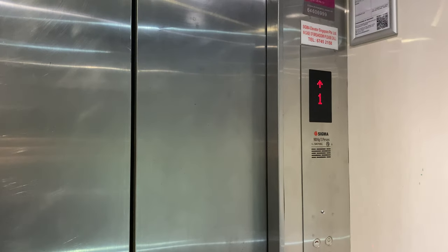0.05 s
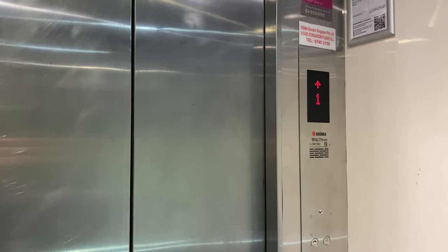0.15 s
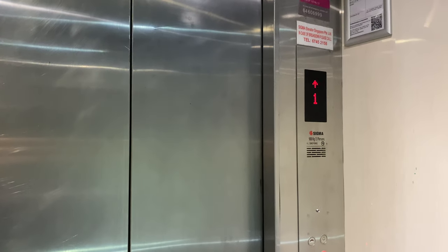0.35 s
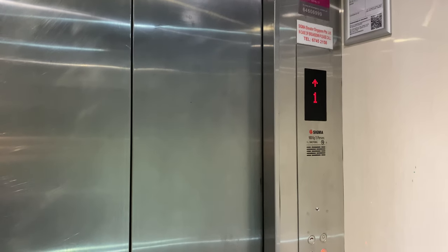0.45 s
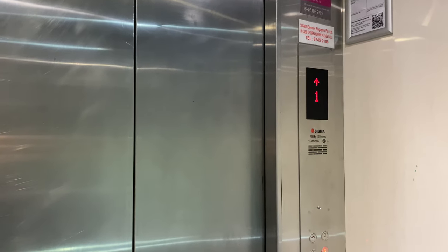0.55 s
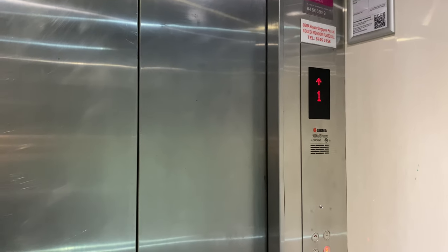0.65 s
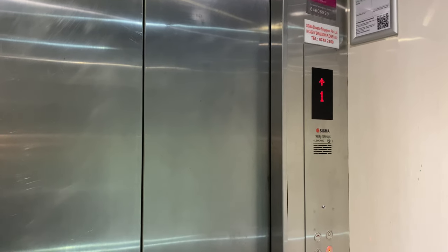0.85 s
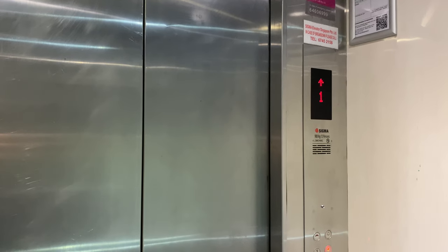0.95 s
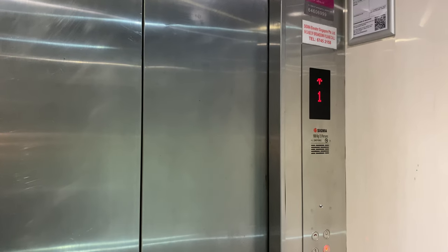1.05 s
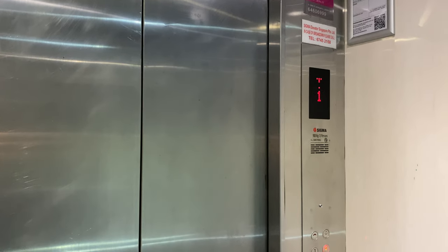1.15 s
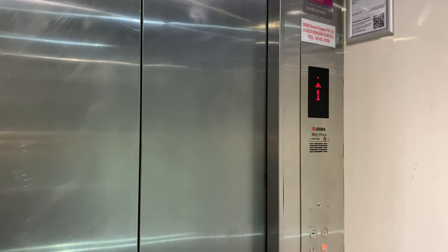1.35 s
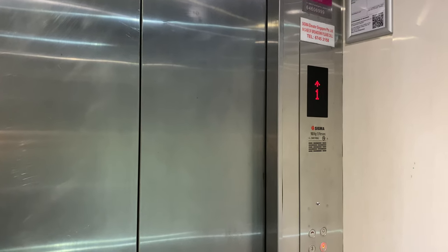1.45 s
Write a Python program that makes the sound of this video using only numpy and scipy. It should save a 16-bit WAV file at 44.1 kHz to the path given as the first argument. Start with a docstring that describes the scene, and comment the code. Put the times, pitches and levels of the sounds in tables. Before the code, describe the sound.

Close to the microphone, metal elevator doors clunk together with a ringing rattle, then latch with a lighter knock. Machinery rumbles low throughout, with a faint high hiss, inside the reflective elevator car.

```python
"""Steel lift doors close over a low rumble: a tick, the edges touch, then the panels clunk together,
rebound and ring. The lock drops with a lighter knock and the car booms softly as it settles.
The machinery hums on with a faint high hiss, a squeak and a whistle.
Heard as from a stereo microphone near the doors, in a hard-walled space: each blow rings modes of
the steel and leaves a dense tail of wall reflections, narrow in the bass and wide in the treble."""
import sys
import numpy as np
from scipy import signal
from scipy.fft import rfft, irfft
from scipy.io import wavfile
from scipy.ndimage import uniform_filter1d

SR = 44100
rng = np.random.default_rng(int(sys.argv[2]) if len(sys.argv) > 2 else 0)


def unload_audio(sound):
    """Save the sound as a 16-bit wav file, at the path given as the first command line argument."""
    columns = np.transpose(np.atleast_2d(sound))
    # keep every value between -1 and 1, then stretch to whole-number steps
    steps = np.round(np.clip(columns, -1, 1) * 32767)
    wavfile.write(sys.argv[1], SR, steps.astype(np.int16))


N = 66150

# stereo width at the microphone, side against mid: frequency_hz, gain_db
STEREO_WIDTH = [(50, -12.5), (110, -6.5), (220, -5), (600, -5), (1200, -1), (2300, 1), (15000, -2)]
# rumble and air of the machinery: frequency_hz, density_db
RUMBLE_SPECTRUM = [(20, -42), (45, 3.5), (75, 1.5), (125, -2), (180, -8), (260, -12), (450, -14.5),
                   (850, -17.5), (1150, -20), (1700, -28.5), (2300, -32), (2600, -31.5), (3100, -38),
                   (4700, -40.5), (8000, -53), (16000, -62.5)]
# hum lines of the machinery: pitch_hz, level_db
HUM_LINES = [(102.3, -48), (134.6, -48), (247.6, -60.5), (630, -64), (824, -61.5), (867, -64.5)]
# swell of rumble and hum together: time_s, gain_db
MACHINE_SWELL = [(0, 0), (.2, 2), (.6, 2), (.9, 0.5), (1.2, -.5), (1.5, -1)]
# colour of the hiss: frequency_hz, density_db
HISS_SPECTRUM = [(1000, -17), (3000, 4), (6700, -2.5), (8500, -8), (11000, -7.5), (12300, -51), (14000, -7),
                 (16000, -29)]
# swell of the hiss: time_s, level_db
HISS_SWELL = [(0, -93), (.49, -66), (.52, -59), (.85, -60), (1.1, -66), (1.22, -61.5), (1.5, -68)]
# thin whistle of the machinery: time_s, pitch_hz, level_db
WHISTLE_PATH = [(0, 13600, -87), (.93, 13500, -80), (1.15, 14300, -69.5), (1.28, 14500, -66),
                (1.45, 14200, -81)]
# jolts of the car: start_s, pitch_hz, level_db
CAR_JOLTS = [(0.314, 44, -34), (.700, 52.4, -23.5), (.704, 125, -21), (1.194, 110.7, -32)]
# dry ticks of the mechanism: start_s, level_db
MECHANISM_TICKS = [(0.129, -39.5), (.4287, -24.5)]
# knocks of the lock: start_s, clack_db, ring_db, clash_db
LOCK_KNOCKS = [(.685, -32, -51, -50), (.702, -39, -40, -44.5), (.744, -40.5, -48, -44)]
# first bite of the hook on its keeper: frequency_hz, density_db
BITE_SPECTRUM = [(800, -25), (1100, 2.5), (1500, -0.5), (2100, -6.5), (3000, -30)]
# dense ringing of the lock: frequency_hz, density_db
CLACK_SPECTRUM = [(300, -2), (800, -1.5), (1050, -3), (1250, 3.5), (1600, -5), (2100, -10), (3000, -21.5),
                  (4500, -15.5), (7000, -36.5)]
# modes of the lock and its bracket: pitch_hz, gain_db, t60_s
BRACKET_MODES = [(399, -1, 0.61), (1028, -8, 0.16), (1247, -6.5, 0.62), (1595, -14, 0.73),
                 (2510, -17, 0.69), (4200, -17, 0.54)]
# modes of the steel panels: pitch_hz, gain_db, t60_s
PANEL_MODES = [(85.48, -1.5, 1.8), (235, -3.5, 0.56), (261.2, -0.5, 0.69), (330.7, -5, 0.46),
               (384.4, -2, 0.53), (454.6, -5, 0.62), (486.8, -8.5, 1.05), (544, -7, 0.6),
               (578.3, -10, 0.46), (658, -9, 0.43), (742, -8.5, 0.55), (847.3, 3, 0.2), (869, -20, 5.3),
               (877.7, 2.5, 0.42), (935, -.5, 0.21)]
# dense ringing of the panels: frequency_hz, density_db
PANEL_SPECTRUM = [(100, -9.5), (230, 3.5), (500, 2.5), (720, -5), (890, 6.5), (1100, -35), (2000, -66)]
# clangs of the door edges as they meet and rebound: start_s, pitch_hz, level_db
EDGE_CLANGS = [(.268, 497, -20.5), (.327, 461, -21), (.359, 464.4, -16.5)]
# slow flexing modes of the whole door: pitch_hz, gain_db, t60_s
FLEX_MODES = [(89.5, 2.5, 0.3), (101.3, -8.5, 0.67), (139, -12.5, 0.34)]
# midrange clatter of the shaken doors: frequency_hz, density_db
CLATTER_SPECTRUM = [(150, 0.5), (500, -7), (900, 5.5), (1250, 1), (1600, -5), (2100, -5), (3300, -16.5),
                    (5000, -42), (9000, -54)]
# bright rattle of hangers and edge strips: frequency_hz, density_db
CLASH_SPECTRUM = [(800, -11), (2000, 4), (2900, 2.5), (4000, -2.5), (6800, -1), (8700, -14.5),
                  (10700, -15.5), (12300, -46), (13600, -15), (15000, -31), (16000, -27)]
# blows on the doors: start_s, thud_db, ring_db, clatter_db, clash_db
DOOR_BLOWS = [(.216, -30.5, -42.5, -45, -36), (.260, -20.5, -37, -40, -35.5), (.269, -49, -20, -26, -33),
              (.284, -31, -20, -28, -42), (.330, -19.5, -26, -37, -48), (.362, -26.5, -36.5, -46, -59),
              (.402, -16, -36.5, -62, -60)]

BUILD_S = 0.0058  # ringing takes this long to build after a blow


def undb(db):
    """Decibels to gain."""
    return 10 ** (np.asarray(db) / 20)


def clock():
    """Time of every sample in seconds."""
    return np.arange(N) / SR


def fade(t, t60_s):
    """Exponential decay by 60 dB in t60_s."""
    return np.exp(-np.log(1000) * t / t60_s)


def add(out, start_s, sound):
    """Mix a sound in from its start time."""
    first = int(max(start_s, 0) * SR)
    out[:, first:] += sound[..., :N - first]


def walk(rate_hz):
    """Smooth random wander with a spread near 1."""
    hold = int(SR / rate_hz)
    steps = np.repeat(rng.standard_normal(N // hold + 1), hold)
    return 1.295 * uniform_filter1d(uniform_filter1d(steps, hold), hold)[:N]


def shape(spectrum):
    """Gain at every frequency from (Hz, dB) points."""
    hz, db = np.array(spectrum, float).T
    return undb(np.interp(np.log(np.fft.rfftfreq(N, 1 / SR) + 1), np.log(hz), db))


def noise(spectrum, grain_db=0, ripple=1):
    """Coloured stereo noise of rms 1, wider in the treble; grain makes it a hail of small reflections."""
    white = rng.standard_normal((2, N))
    grains = np.repeat(rng.standard_normal(N // 32 + 1), 32)[:N]
    mid, side = rfft(white * undb(grain_db * grains)) * shape(spectrum) * ripple
    side = side * shape(STEREO_WIDTH)
    stereo = irfft(np.array([mid + side, mid - side]), N)
    return stereo / stereo.std()


def resonances(height_db=3, spacing_hz=25.06):
    """Random fine peaks and dips in the response of the metal."""
    position = np.fft.rfftfreq(N, 1 / SR) / spacing_hz
    heights = rng.standard_normal((2, 4096))
    return undb(height_db * np.array([np.interp(position, np.arange(len(row)), row) for row in heights]))


def whine(pitch_hz, level_db, jitter_hz, rate_hz):
    """A tone whose pitch trembles at random, differently left and right."""
    trembling_hz = pitch_hz + jitter_hz * np.array([walk(rate_hz), walk(rate_hz)])
    return np.sqrt(2) * undb(level_db) * np.sin(2 * np.pi * np.cumsum(trembling_hz, axis=1) / SR)


def tones(rows, rise_s, t60_s):
    """One damped resonance for each row."""
    t, out = clock(), np.zeros((2, N))
    envelope = (1 - np.exp(-t / rise_s)) * fade(t, t60_s)
    for start_s, pitch_hz, level_db in rows:
        add(out, start_s, 2 * undb(level_db) * envelope * np.sin(2 * np.pi * pitch_hz * t))
    return out


def wash(spectrum, t60_s, ripple=1, build_s=BUILD_S, crack_db=-6.5, crack_s=0.0049):
    """Countless close modes and wall reflections: a short crack, then a tail that builds and dies."""
    t = clock()
    crack = undb(crack_db) * np.exp(-t / crack_s)
    tail = (1 - np.exp(-t / build_s)) * fade(t, t60_s)
    return noise(spectrum, grain_db=1, ripple=ripple) * (crack + tail)


def ring(modes, strikes, beat_db=2, beat_rad=0.52, spread_rad=0.98, wide_hz=480):
    """Modes store each strike's energy and ring it out, wavering as close pairs of modes do."""
    t, sides = clock(), np.array([[1], [-1]])
    push, out = np.zeros((1, N)), np.zeros((2, N))
    for start_s, level_db in strikes:
        add(push, start_s, undb(level_db) ** 2 * np.exp(-t / BUILD_S) / (BUILD_S * SR))
    for pitch_hz, gain_db, t60_s in modes:
        energy = signal.lfilter([1], [1, -fade(2 / SR, t60_s)], push)
        # low modes reach both sides of the microphone nearly in step
        spread = rng.choice([-1, 1]) * spread_rad * min(pitch_hz / wide_hz, 1)
        phase = 2 * np.pi * (pitch_hz * t + rng.random()) + beat_rad * walk(39.32) + sides * spread / 2
        out += undb(gain_db + beat_db * walk(52.37)) * np.sqrt(energy) * np.sin(phase)
    return out


def machinery(rumble_db=-40, drift_hz=1.49, waver_db=3, flicker_db=1.34):
    """The background: rumble, wavering hum lines, and a hiss that comes up once the doors are shut."""
    t = clock()
    drone = undb(rumble_db) * noise(RUMBLE_SPECTRUM)
    for pitch_hz, level_db in HUM_LINES:
        phase = 2 * np.pi * np.cumsum(pitch_hz + drift_hz * walk(8.19)) / SR
        drone += np.sqrt(2) * undb(level_db + waver_db * walk(8.94)) * np.sin(phase)
    swell_db = np.interp(t, *np.array(MACHINE_SWELL).T)
    hiss_db = np.interp(t, *np.array(HISS_SWELL).T) + flicker_db * walk(24.05)
    return undb(swell_db) * drone + undb(hiss_db) * noise(HISS_SPECTRUM, ripple=resonances())


def squeak():
    """A thin, unsteady squeak flickers in the machinery."""
    level_db = -65 + 4.5 * np.tanh(walk(55))
    return whine(pitch_hz=2566, level_db=level_db, jitter_hz=34.54, rate_hz=150)


def whistle():
    """A faint, airy whistle rises and swells once the doors are locked."""
    t = clock()
    time_s, pitch_hz, level_db = np.array(WHISTLE_PATH).T
    return whine(np.interp(t, time_s, pitch_hz), np.interp(t, time_s, level_db), jitter_hz=430, rate_hz=2000)


def jolts():
    """The car booms softly after the clunk, after the lock and once more as it settles."""
    return tones(CAR_JOLTS, rise_s=0.013, t60_s=0.23)


def ticks(band_hz=(600, 3400)):
    """Tiny dry snaps of the mechanism, each a single sharp pulse in the centre."""
    out = np.zeros((2, N))
    band = signal.butter(2, band_hz, "band", fs=SR, output="sos")
    snap = signal.sosfilt(band, signal.unit_impulse(N))
    for start_s, level_db in MECHANISM_TICKS:
        add(out, start_s, undb(level_db) * snap / snap.max())
    return out


def clash(metal):
    """The bright rattle of hangers and edge strips swells a little after the blow."""
    return wash(CLASH_SPECTRUM, t60_s=0.43, ripple=metal, build_s=0.0084)


def lock(metal):
    """The hook bites, clacks home, settles and leaves its bracket ringing."""
    out = ring(BRACKET_MODES, [(start_s, ring_db) for start_s, _, ring_db, _ in LOCK_KNOCKS])
    bite = undb(-31.5) * noise(BITE_SPECTRUM, ripple=metal) * fade(clock(), t60_s=0.088)
    add(out, LOCK_KNOCKS[0][0], bite)
    for start_s, clack_db, _, clash_db in LOCK_KNOCKS:
        clack = undb(clack_db) * wash(CLACK_SPECTRUM, t60_s=0.36, ripple=metal)
        add(out, start_s, clack + undb(clash_db) * clash(metal))
    return out


def panels(modes_db=-5, dense_db=-4, left_db=1.5):
    """Just left of centre, steel sheets answer each blow with clear and dense ringing; the edges clang."""
    strikes = [(start_s, ring_db) for start_s, _, ring_db, *_ in DOOR_BLOWS + LOCK_KNOCKS]
    out = undb(modes_db) * ring(PANEL_MODES, strikes)
    out += tones(EDGE_CLANGS, rise_s=0.003, t60_s=0.065)
    for start_s, ring_db in strikes:
        add(out, start_s, undb(ring_db + dense_db) * wash(PANEL_SPECTRUM, t60_s=0.56))
    return out * undb(np.array([[1], [-1]]) * left_db / 2)


def doors(metal, rise_s=0.0017):
    """In the foreground, every blow flexes the doors and shakes the hangers and edge strips."""
    t, out = clock(), np.zeros((2, N))
    flex = sum(undb(db) * fade(t, t60_s) * np.sin(2 * np.pi * hz * t) for hz, db, t60_s in FLEX_MODES)
    thud = (1 - np.exp(-t / rise_s)) * flex
    for start_s, thud_db, _, clatter_db, clash_db in DOOR_BLOWS:
        clatter = undb(clatter_db) * wash(CLATTER_SPECTRUM, t60_s=0.46, ripple=metal)
        add(out, start_s, undb(thud_db) * thud + clatter + undb(clash_db) * clash(metal))
    return out


def scene():
    """Doors, lock and car in front, the machinery behind."""
    metal = resonances()  # the same steel colours every blow
    foreground = doors(metal) + lock(metal) + panels() + jolts() + ticks()
    background = machinery() + squeak() + whistle()
    return foreground + background


def record(dry, low_cut_hz=35.4, top_hz=15600):
    """Behind the microphone, the recorder cuts the deepest bass and the top."""
    low_cut = signal.butter(2, low_cut_hz, "high", fs=SR, output="sos")
    top_cut = signal.ellip(8, .2, 70, top_hz, fs=SR, output="sos")
    return signal.sosfilt(top_cut, signal.sosfilt(low_cut, dry))


dry = scene()
out = record(dry)
unload_audio(out)
```